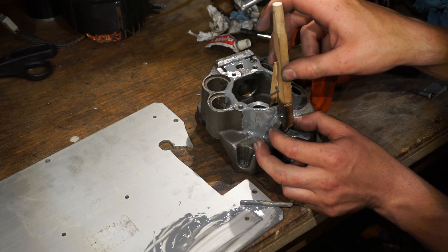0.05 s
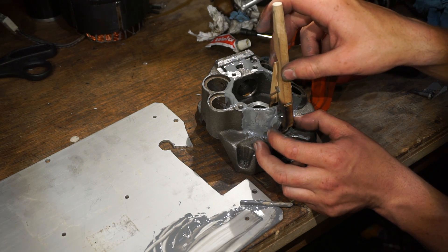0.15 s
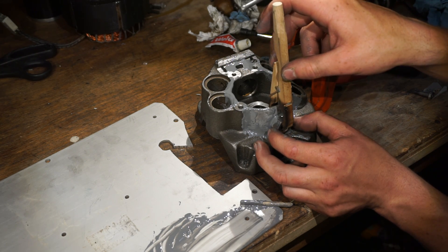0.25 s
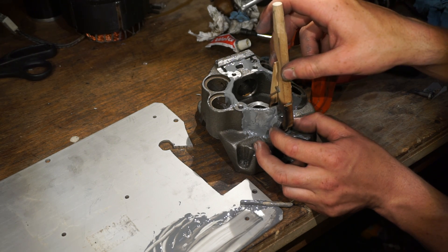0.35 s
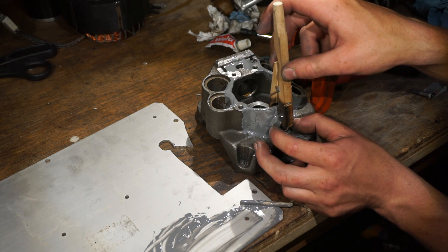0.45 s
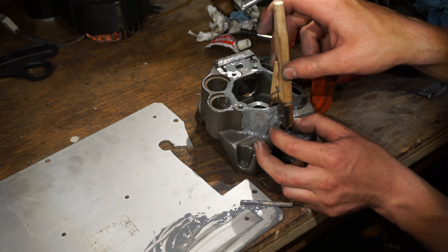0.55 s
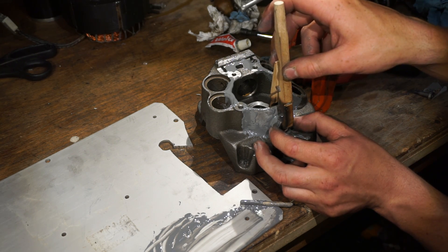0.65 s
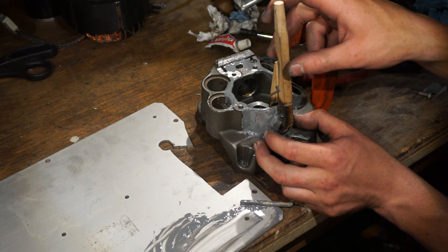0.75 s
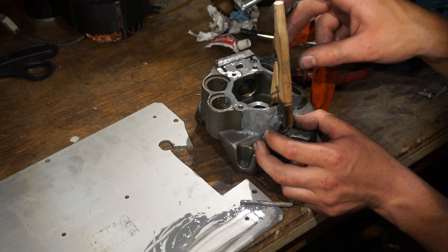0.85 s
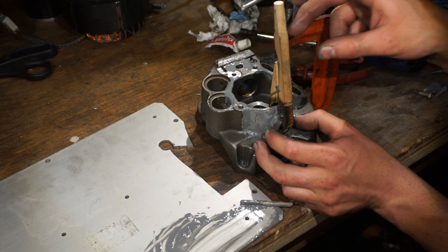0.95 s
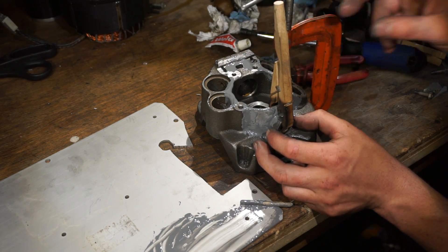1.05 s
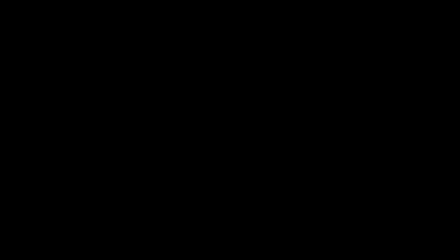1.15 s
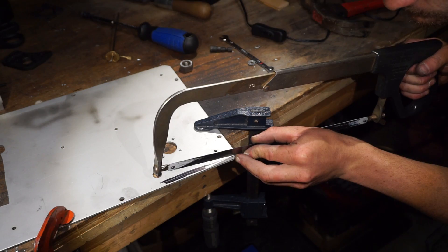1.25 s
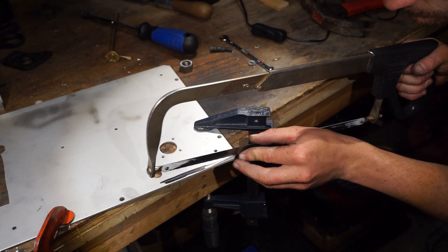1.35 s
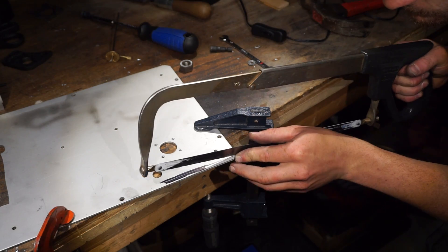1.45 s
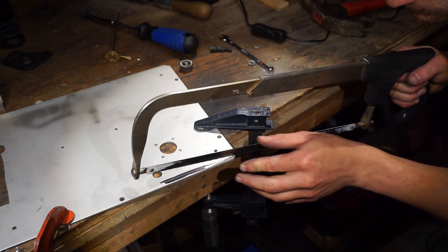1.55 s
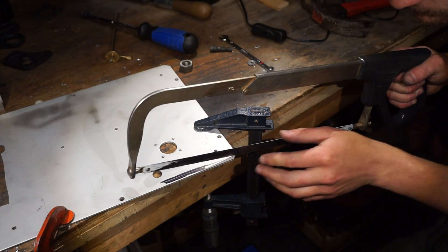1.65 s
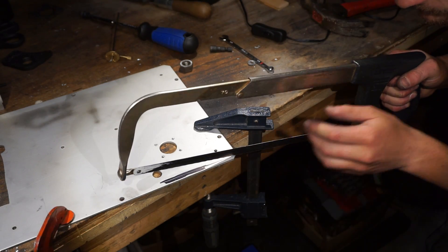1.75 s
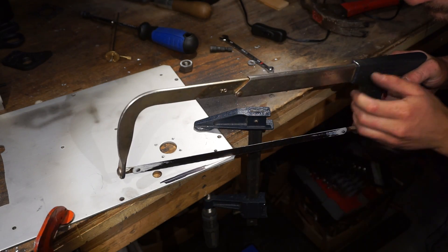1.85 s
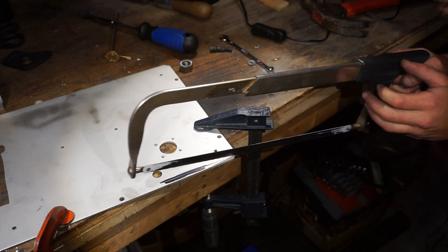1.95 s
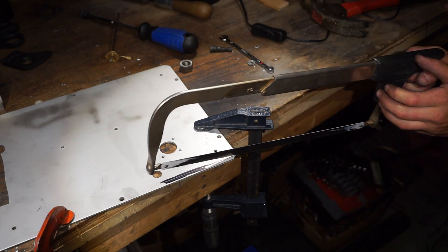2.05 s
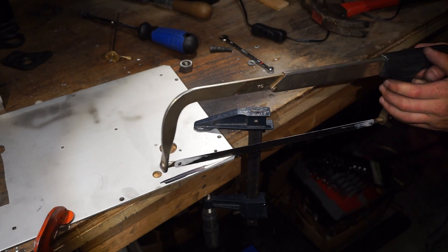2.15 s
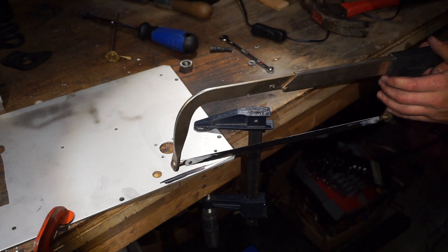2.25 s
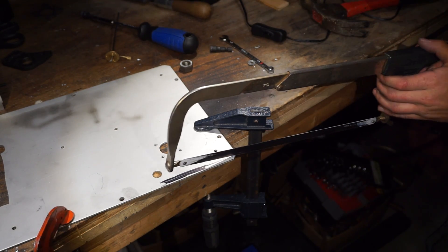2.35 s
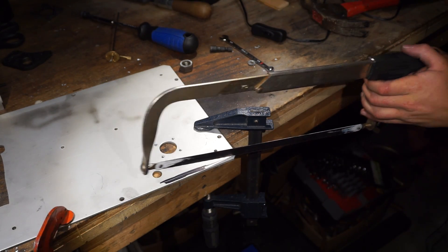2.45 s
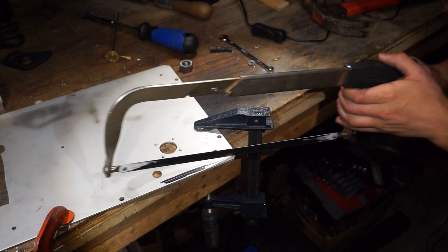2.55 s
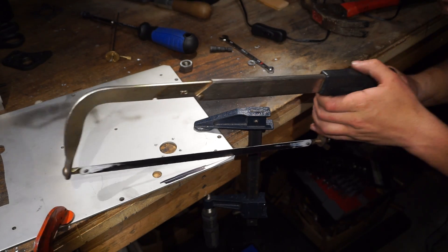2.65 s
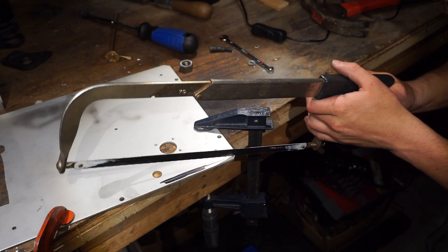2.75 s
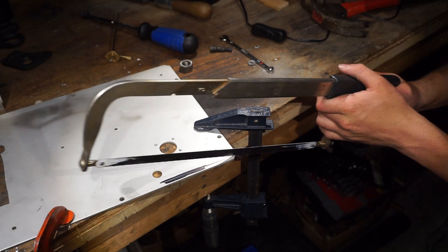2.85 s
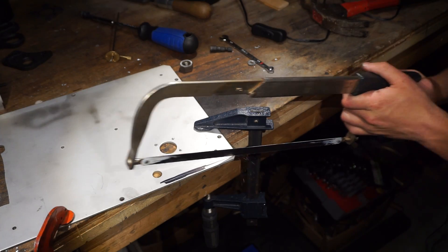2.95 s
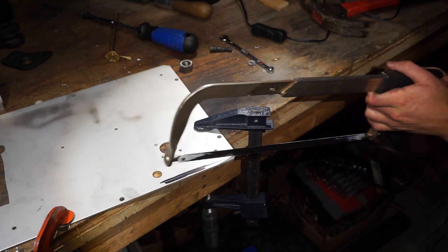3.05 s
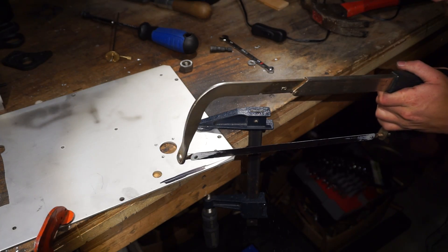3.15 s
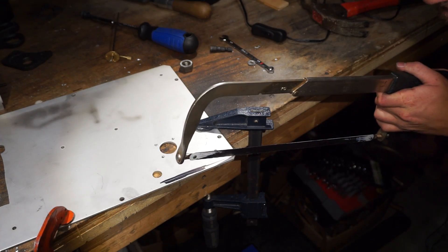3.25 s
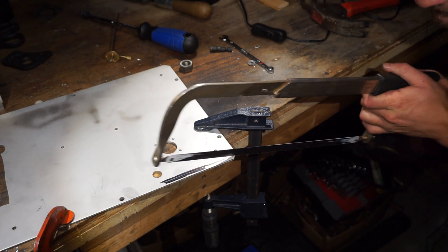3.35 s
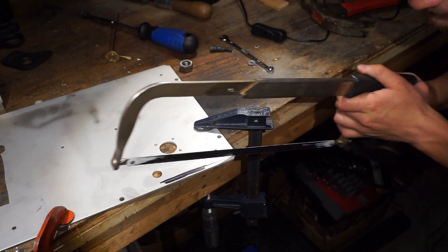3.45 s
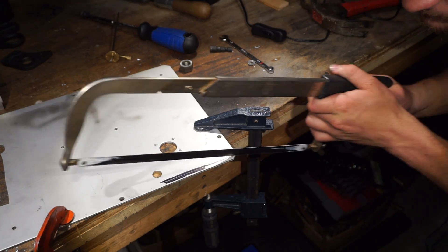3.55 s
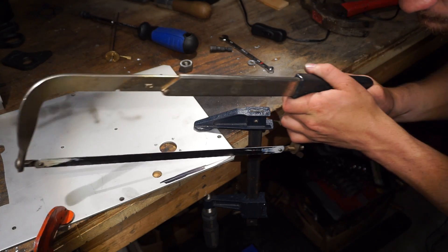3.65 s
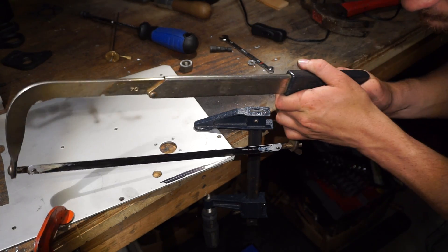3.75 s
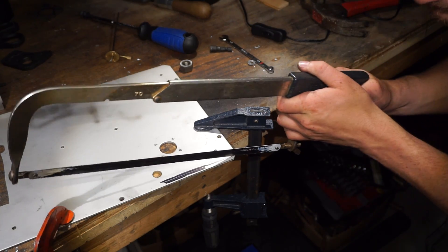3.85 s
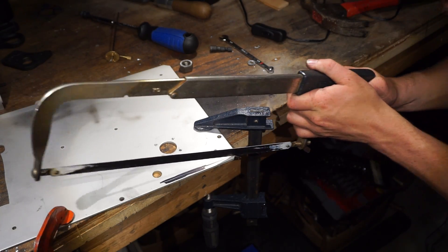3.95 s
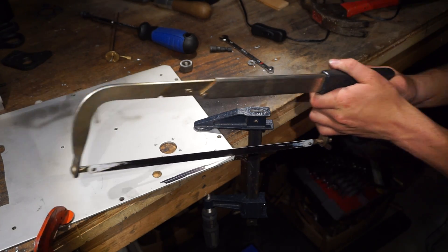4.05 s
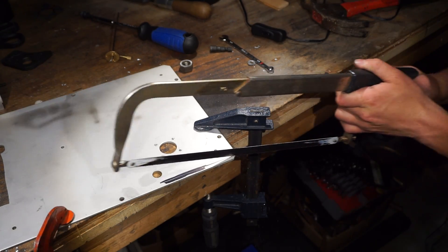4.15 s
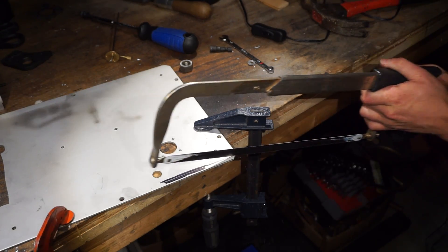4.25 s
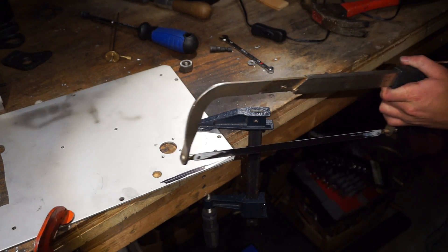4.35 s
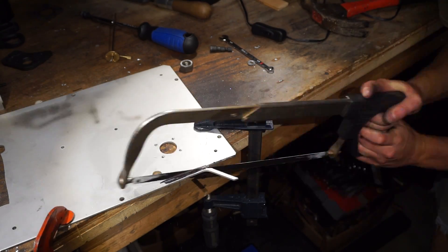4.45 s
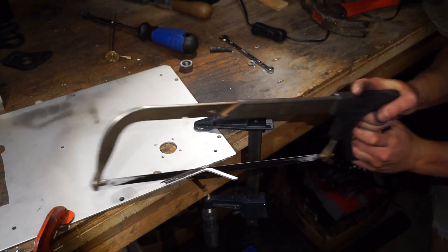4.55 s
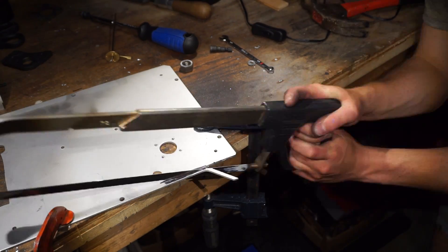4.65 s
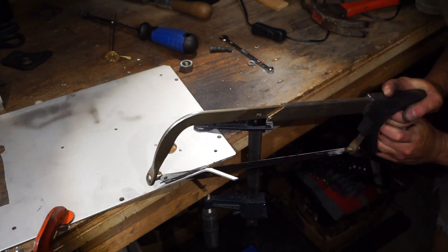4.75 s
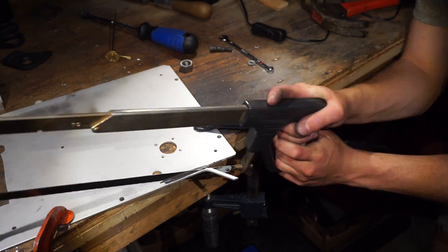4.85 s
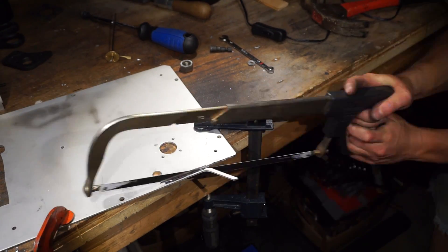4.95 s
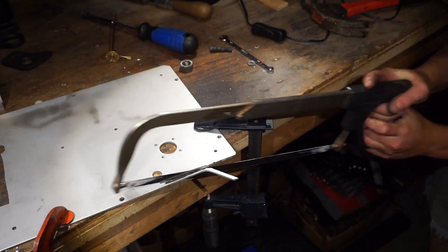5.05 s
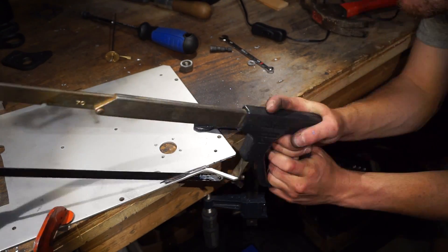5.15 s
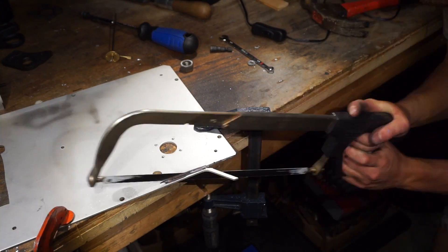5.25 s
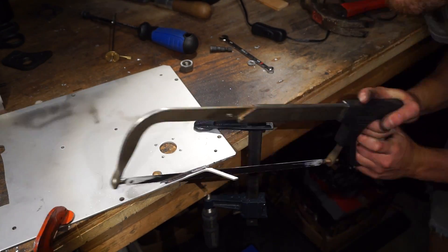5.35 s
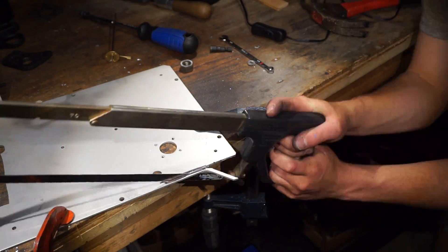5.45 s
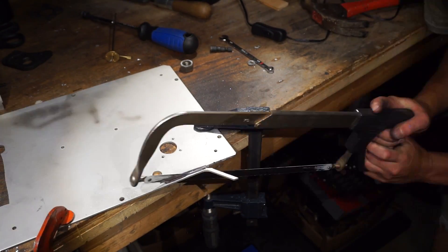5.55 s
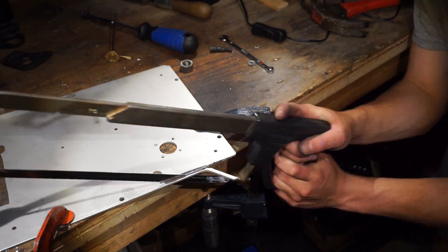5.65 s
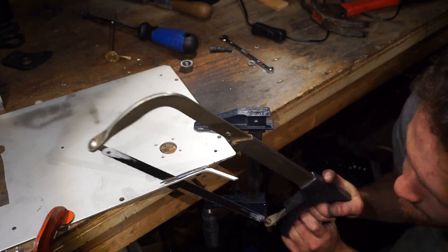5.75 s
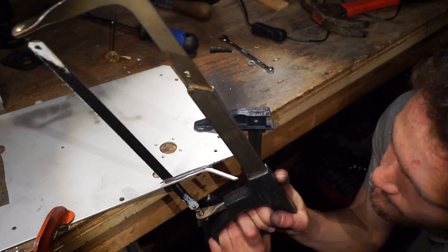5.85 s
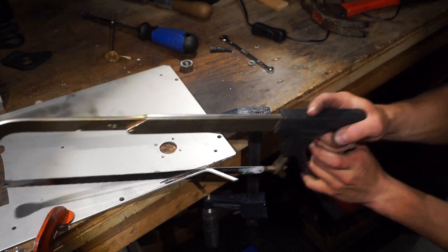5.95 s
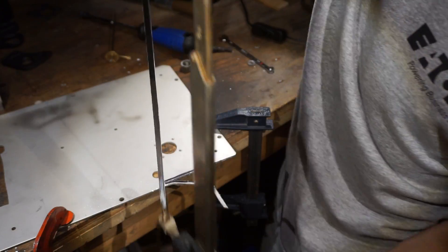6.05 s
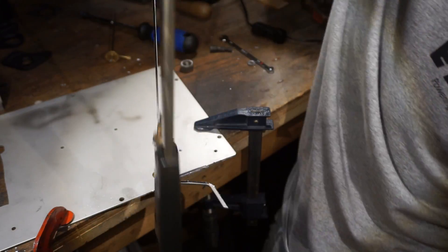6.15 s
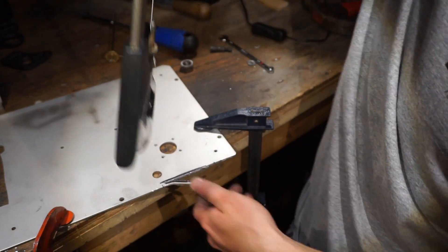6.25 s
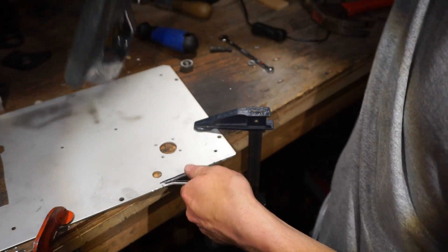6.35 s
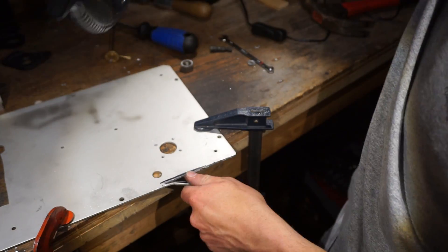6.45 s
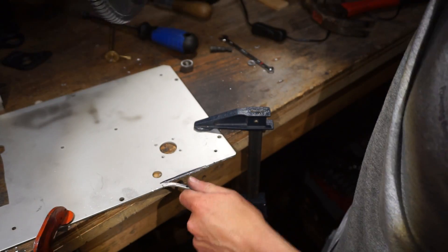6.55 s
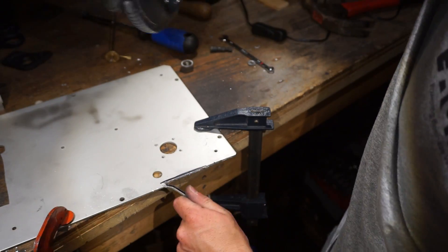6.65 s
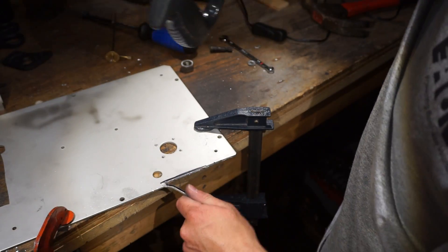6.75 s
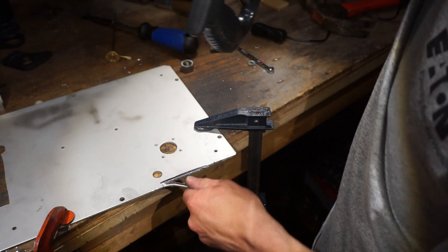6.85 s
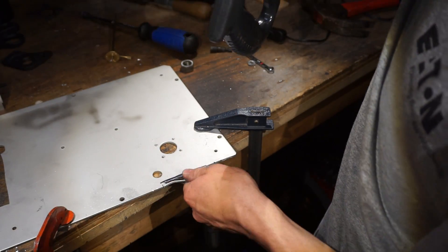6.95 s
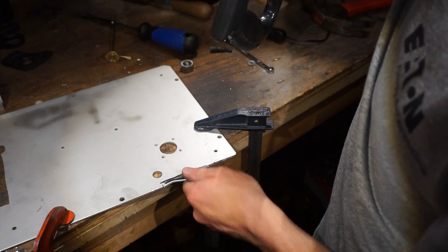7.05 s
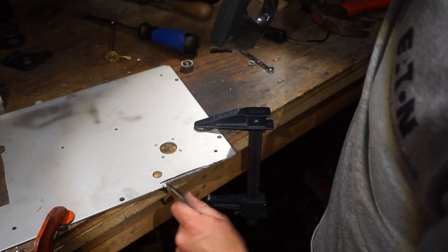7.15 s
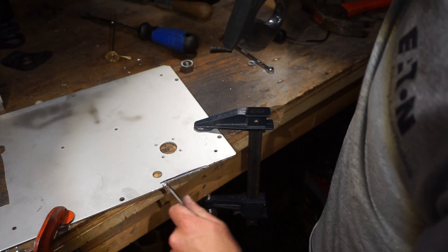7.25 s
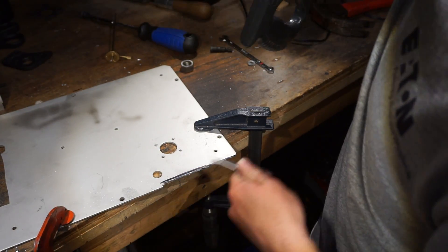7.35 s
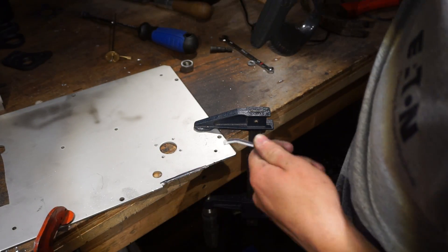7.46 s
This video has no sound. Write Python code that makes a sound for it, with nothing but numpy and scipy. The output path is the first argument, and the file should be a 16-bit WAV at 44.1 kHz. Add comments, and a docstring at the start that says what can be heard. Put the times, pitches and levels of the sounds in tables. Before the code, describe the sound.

Quiet workshop hiss and low rumble, then a hacksaw skids and bites into a clamped aluminium sheet. Slow uneven push and pull strokes ring the metal with a buzzing, hollow bench hum. A cut jumps to very fast sawing, then to near quiet with cloth swishes, small sharp ticks and a faint scrape of the bent strip. Close stereo microphone, saw mostly left, dry room.

```python
"""Quiet room tone comes first: coloured noise whose level changes in steps.
A hacksaw then cuts a clamped aluminium sheet, mostly to the left: slow strokes, then a very rapid run.
Uneven tooth strikes ring the sheet, its low sway, the blade's buzz and the bench.
Cloth then swishes (swells of grainy noise), and the cut strip ticks (short cracks that ring it)
and scrapes (tooth noise in broad bands). The sound dips to silence briefly three times."""
import sys
import numpy as np
from scipy import signal
from scipy.fft import rfft, irfft, next_fast_len
from scipy.io import wavfile
from scipy.ndimage import uniform_filter1d

SR = 44100
rng = np.random.default_rng(int(sys.argv[2]) if len(sys.argv) > 2 else 0)


def store_wav(level_fs):
    """Save 16-bit WAV to argv[1]."""
    pcm = np.round(np.clip(np.atleast_2d(level_fs), -1, 1) * 32767)
    wavfile.write(sys.argv[1], SR, pcm.T.astype(np.int16))


N = 331191
T = np.arange(N) / SR  # time in seconds
SIZE = next_fast_len(N + SR // 2)  # room for filter tails
HZ = np.fft.rfftfreq(SIZE, 1 / SR)

# Room tone from each time on, before colouring of the channels: t/s, hiss level/dB, rumble level/dB,
# high air level/dB
ROOM_STEPS = [(0, -59.5, -57.5, -67), (1.192, -58, -55.5, -58), (6.026, -67.5, -66.5, -93.5),
              (7.118, -64.5, -61, -63.5)]
# Colour of the hiss: f/Hz, relative level/dB per Hz
HISS_COLOUR = [(530, -41), (900, -6.5), (1680, -3), (2890, -7.5), (3680, -8), (12600, -14.5), (16000, -10)]
# Colour of the rumble: f/Hz, relative level/dB per Hz
RUMBLE_COLOUR = [(12, -37), (20, -5.5), (113, 0), (246, -4.5), (1270, -11), (1500, -18.5), (1950, -48),
                 (3300, -120)]
# Likeness of left and right in hiss and rumble: f/Hz, likeness/1 (negative means opposed)
ROOM_LIKENESS = [(60, 1), (240, 0.34), (950, -0.51), (3770, -0.021), (15000, -0.42)]
AIR_HZ = 9000  # the high air spans one octave from here

# Slow strokes, levels before the filters: way, bite t/s, lift t/s, rasp level at bite/dB, at lift/dB,
# fade/(dB per s), sway above the rasp at bite/dB, at lift/dB, top buzz above the rasp/dB, bench jolt level/dB
SLOW_STROKES = [("skate", 1.426, 1.43, -32, -37.5, 170, -8, -9, -16, -49),
                ("skate", 1.515, 1.556, -38, -39.5, 155, -21, -4, -17, -51),
                ("skate", 1.722, 1.76, -36, -36, 248, -11, 0.5, -2, -49),
                ("push", 2.0016, 2.249, -29.5, -37, 140, 1.5, -3, -8.5, -43),
                ("pull", 2.412, 2.694, -31.5, -25, 197, -8, -3.5, -5, -44.5),
                ("push", 2.88, 3.138, -22.5, -26, 156, -8, -5, -14.5, -40),
                ("pull", 3.3555, 3.71, -30, -25, 218, -10, 5.6, 2.5, -34.5),
                ("slip", 3.818, 3.806, -36, -38, 180, -1.5, -8, -12.5, -57),
                ("push", 3.99, 4.397, -24, -25, 61, -10, -6.5, -20.5, -38)]
# Ways to stroke: sway at bite f/Hz, at lift f/Hz, thrum at bite f/Hz, at lift f/Hz,
# lateness/1 (a power: higher makes the sway level change later)
STROKE_WAYS = {"push": (540, 520, 146, 92, 1.3), "pull": (500, 599, 190, 190, 9.4),
               "skate": (595, 609, 126, 166, 2), "slip": (540, 560, 175, 170, 3.3)}
# Teeth that catch hard: t/s, level/dB (before the swell shape and filters)
SNAGS_OF_TEETH = [(1.3554, -30), (1.3724, -17), (2.052, -25.5), (1.976, -25), (2.481, -14), (3.931, -24)]
# Start and end of the slow part: t/s, t/s
SLOW_SPAN = (1.34, 4.472)
RISE_DB_PER_S, ARCH_DB, REST_DB = 424, 2, -57  # before the bite; extra in mid-stroke; blade lying in the cut
LINGER = 0.71  # sway and buzz fade at this share of the rasp's pace
SWAY_DROP_HZ_PER_S, SINK_EARLY_S, SINK_S = 1300, 0.03, 0.07  # sway sinks from just before the lift, this long
BUZZ_BITE_HZ, BUZZ_LIFT_HZ, BUZZ_LOW_DB = 835, 745, -27
BUZZ_TOP, BUZZ_SPAN = 0.73, 0.34  # when the buzz peaks and how widely, as shares of the stroke
THRUM_DB, JOLT_LATE_S, JOLT_SPAN_S = -27, 0.04, 0.067  # above the rasp; the jolt as the arm brakes

# Ringing modes of the sheet: f/Hz, width f/Hz (widened where too narrow), relative level/dB
SHEET_MODES = [(963, 19, -11), (1480, 74, 4.5), (1930, 37, -21.5), (2624, 230, -1.5), (3010, 160, -0.5),
               (2987, 100, 1), (4363, 73, -10.5), (4820, 70, -4), (6706, 99, -9), (7730, 90, -10),
               (8730, 140, -16), (9380, 100, -9), (11250, 68, -16.5), (12230, 45, -11)]
# Modes of the sheet with the strip nearly off: f/Hz, width f/Hz (widened where too narrow), relative level/dB
DEEP_CUT_MODES = [(1392, 41, -1.5), (2825, 105, 6), (3310, 117, -0.5), (4300, 31, 4), (6650, 57, -10),
                  (8550, 84, -3), (10360, 23, -11), (10650, 310, -3.5)]
# Wide colour under the ringing modes: f/Hz, relative level/dB per Hz
RASP_COLOUR = [(140, -34.5), (230, -10), (840, -2.5), (952, -7.5), (1380, -2.5), (4380, -14.5),
               (7330, -19.5), (10800, -16), (16000, -18.5)]
# Likeness of left and right in the saw: f/Hz, likeness/1
SAW_LIKENESS = [(60, 0.74), (180, 1), (550, 0.79), (1650, 0.48), (4970, 0.37), (15000, 0.035)]
# How far the saw leans to the left: f/Hz, left minus right level/dB
SAW_LEAN = [(60, 15.5), (180, 1.5), (550, 1.5), (1650, 6.5), (4970, 8.5), (15000, 4.5)]
LEAST_WIDTH = 0.04  # the rubbing blade damps every mode to at least this share of its pitch
SKATE_DB, SKATE_UNTIL_S = -4, 1.9  # bright fizz while the groove is still shallow
RATTLE_DB, SHAKE_DB = -10, -18.5  # sheet rattle above its sway; deep bench shaking above the rasp

# Rapid run, at the strokes numbered below: t/s, rasp level/dB (before push, unevenness and filters)
RAPID_POINTS = [(4.485, -34.5), (4.769, -34.5), (5.058, -34.5), (5.243, -33), (5.329, -36), (5.508, -33),
                (5.717, -33), (5.908, -35.5), (5.943, -33.5), (5.997, -42)]
# Stroke numbers of those points, even ones are pulls: number/1
RAPID_NUMBERS = (0, 8, 16, 21, 23, 28, 34, 40, 41, 42)
RAPID_S, RAPID_THRUM_DB = 0.01, -18.5  # half length of a stroke; thrum above the rasp
RAPID_SWAY_HZ, RAPID_BUZZ_HZ, RAPID_THRUM_HZ = 515, 829, 143  # middle pitches; buzz is higher in a deep cut
PUSH_LATE_S, PUSH_DB, UNEVEN_DB = 0.0021, -2, -0.86  # pushes against pulls; random spread of all strokes
PULL_TILT_DB, PUSH_TILT_DB, TILT_SCATTER_DB = 10, -11, 5.5  # more tilt: stronger buzz, weaker sway

# Swishes of cloth: middle t/s, half length t/s, level/dB (before the grain is mixed)
CLOTH_SWISHES = [(6.049, 0.012, -65.5), (6.178, 0.042, -52.5), (6.512, 0.066, -63), (6.611, 0.038, -68),
                 (7.162, 0.0098, -60)]
# Colour of the cloth: f/Hz, relative level/dB per Hz
CLOTH_COLOUR = [(180, -69), (300, -39), (930, -6), (1060, -14), (3080, -2), (6300, -9), (13100, -4),
                (16000, -12)]

# Ticks of strip and tool: t/s, level/dB (before filter and panning), brightest f/Hz,
# relative dull knock level/dB, left minus right level/dB
STRIP_TICKS = [(6.2078, -41, 5340, -12.5, 8), (6.249, -39.5, 4370, -14, 4), (6.4519, -37.5, 5040, -22, 2),
               (6.5204, -44, 2630, -21, -4), (6.5674, -33.5, 5000, -20, 4.5), (7.0943, -57, 9100, -17, 11),
               (7.1252, -58.5, 1530, 16.5, 4.0), (7.1501, -56, 4270, -28, 16), (7.3157, -38, 2460, -4.5, 6)]
# Ringing of the strip: f/Hz, relative level/dB, time to fade by 60 dB t/s
STRIP_RING = [(2770, -7, 0.032), (4500, 2, 0.045), (5320, 2, 0.048)]
# Dull knock of the sheet: lowest f/Hz, highest f/Hz, time to fade by 60 dB t/s
SHEET_KNOCK = (490, 950, 0.38)

# Fingers rubbing the strip: start t/s, end t/s, rise t/s, level/dB (before the left-right split)
FINGER_RUBS = [(6.301, 6.614, .025, -54.5), (6.709, 6.8, 0.046, -60.5)]
# Broad bands of the rubbing: f/Hz, width f/Hz (widened where too narrow), relative level/dB
RUBBING_BANDS = [(2530, 1100, 7.5), (3340, 130, 9), (4040, 710, 4.5), (5700, 600, 1.5)]
RUB_TAIL_S = 0.064

# Middles of the brief dips to silence: t/s
SILENT_DIPS = (1.185, 4.474, 6.027)
EDGE_HZ = 15950  # upper limit of the finished sound


def gain_of(db):
    """Turns decibels into a plain gain."""
    return 10 ** (np.asarray(db) / 20)


def evened(x):
    """Scales a signal to an average strength (rms) of 1."""
    return x / np.sqrt(np.mean(abs(x) ** 2) + 1e-20)


def read(points):
    """Reads a spectrum table at every frequency, with pitch on a logarithmic scale."""
    f, value = np.transpose(points)
    return np.interp(np.log(HZ + 1), np.log(f + 1), value)


def coloured(x, response):
    """Filters by a response that keeps the rms of white noise."""
    return irfft(rfft(x, SIZE) * evened(response), SIZE)[..., :N]


def band(x, low_hz, high_hz):
    """Keeps one band of frequencies and scales it to rms 1."""
    edges = signal.butter(2, [low_hz, high_hz], "band", fs=SR, output="sos")
    return evened(signal.sosfilt(edges, x))


def paired(a, b, same):
    """Spectra of left and right from two unrelated signals, alike by the given share."""
    c = np.clip(read(same), -1, 1)
    a, b = rfft(a, SIZE), rfft(b, SIZE)
    return np.array([a, c * a + np.sqrt(1 - c ** 2) * b])


def room_tone():
    """Hiss, rumble and thin high air are coloured noises that step to new levels at set times."""
    start, *levels_db = np.transpose(ROOM_STEPS)
    step = np.searchsorted(start, T, "right") - 1
    hiss, rumble, air = gain_of(levels_db)[:, step]
    noise = rng.standard_normal((3, 2, N))
    mix = hiss * coloured(noise[0], gain_of(read(HISS_COLOUR)))
    mix += rumble * coloured(noise[1], gain_of(read(RUMBLE_COLOUR)))
    room = irfft(paired(*mix, ROOM_LIKENESS), SIZE)[:, :N]
    return room + air * band(noise[2], AIR_HZ, 2 * AIR_HZ)


def slow_strokes():
    """Each stroke rises, bites, arches and fades; its way sets how sway and thrum move."""
    power, tones = np.zeros((4, N)), np.zeros((3, N))
    power[0] = gain_of(2 * REST_DB)
    for way, bite, lift, bite_db, lift_db, fade, sway_0_db, sway_1_db, buzz_db, jolt_db in SLOW_STROKES:
        sway_0, sway_1, thrum_0, thrum_1, lateness = STROKE_WAYS[way]
        early, late = np.maximum(bite - T, 0), np.maximum(T - lift, 0)
        u = np.clip((T - bite) / (lift - bite), 0, 1)  # share of the stroke done
        held_db = bite_db + (lift_db - bite_db) * u + ARCH_DB * np.sin(np.pi * u) - RISE_DB_PER_S * early
        rasp_db = held_db - fade * late
        lingering_db = held_db - LINGER * fade * late
        sway_db = sway_0_db + (sway_1_db - sway_0_db) * u ** lateness
        buzz_top = np.exp(-.5 * ((u - BUZZ_TOP) / BUZZ_SPAN) ** 2)
        buzz_now_db = BUZZ_LOW_DB + (buzz_db - BUZZ_LOW_DB) * buzz_top
        jolt = gain_of(2 * jolt_db) * np.exp(-((T - lift - JOLT_LATE_S) / JOLT_SPAN_S) ** 2)
        # doubled decibels turn gain into power, so strokes add up smoothly
        power[0] += gain_of(2 * rasp_db)
        power[1] += gain_of(2 * (lingering_db + sway_db))
        power[2] += gain_of(2 * (lingering_db + buzz_now_db))
        power[3] += gain_of(2 * (rasp_db + THRUM_DB)) + jolt
        ends = np.array([(sway_0, sway_1), (BUZZ_BITE_HZ, BUZZ_LIFT_HZ), (thrum_0, thrum_1)])
        hz = ends[:, :1] + np.diff(ends) * u
        hz[0] -= SWAY_DROP_HZ_PER_S * np.clip(T - lift + SINK_EARLY_S, 0, SINK_S)
        # each stroke takes over the pitches 60 ms before its bite
        tones = np.where((T > bite - .06) | (tones == 0), hz, tones)
    rasp, *others = np.sqrt(power)
    for at, db in SNAGS_OF_TEETH:
        since = np.maximum(T - at, 0) / .004  # a catch swells for a moment, then slips free
        rasp = rasp + gain_of(db) * since * np.exp(-since)
    on = (T > SLOW_SPAN[0]) & (T <= SLOW_SPAN[1])
    return np.array([rasp, *others, *tones]) * on


def teeth(per_s, spread_db, grit, shudder_db):
    """Two trains of uneven tooth strikes over the grit of chips; the blade shudders in bunches."""
    strength_db = spread_db * np.minimum(rng.exponential(1, (2, N)), 3.5)
    size = gain_of(strength_db) * np.sign(rng.random((2, N)) - .5)
    strikes = evened(size * (rng.random((2, N)) < per_s / SR))
    slow_noise = uniform_filter1d(rng.standard_normal(N), size=300)
    shudder = evened(uniform_filter1d(slow_noise, size=300))
    return evened((strikes + grit * rng.standard_normal((2, N))) * gain_of(shudder_db * shudder))


def modes(table):
    """Response of damped resonances with alternating signs."""
    f, width, db = np.transpose(table)
    width = np.maximum(width, LEAST_WIDTH * f)
    total = 0
    for k in range(len(f)):
        damping = 1j * width[k] * HZ
        total = total + (-1) ** k * gain_of(db[k]) * damping / (f[k] ** 2 - HZ ** 2 + damping)
    return total


def resonate(x, hz, width):
    """A moving resonance: shift down, smooth twice, shift back; white noise keeps rms 1."""
    turn = np.exp(2j * np.pi * np.cumsum(hz) / SR)
    r = np.exp(-np.pi * width / SR)
    smooth = signal.lfilter([(1 - r) ** 2], [1, -2 * r, r * r], x / turn)
    return (turn * smooth).real * np.sqrt(8 / (1 - r))


def shimmer(x, t60, turns_per_s):
    """The countless small modes of sheet and room: dense rings take turns as the contact point moves."""
    t = np.arange(SR // 5) / SR
    rings = rng.standard_normal((3, len(t))) * gain_of(-60 * t / t60)
    rings /= np.linalg.norm(rings, axis=1, keepdims=True)
    shares = np.sqrt(2 / 3) * np.cos(np.pi * (turns_per_s * T + np.arange(3)[:, None] / 3))
    return signal.oaconvolve(x * shares, rings, axes=1).sum(0)[:N]


def bench(rasp, thrum, hz):
    """The bench hums at a moving pitch over a wide, deep shaking that follows the rasp."""
    shake = rng.standard_normal(N)
    return thrum * resonate(shake, hz, 38) + gain_of(SHAKE_DB) * rasp * band(shake, 56, 190)


def saw():
    """The teeth drive the sheet's modes, its low sway, the blade's buzz and the bench."""
    slow, rapid = slow_strokes(), rapid_strokes()
    rasp_gain, _, _, thrum, sway_hz, buzz_hz, thrum_hz = slow + rapid
    drive = teeth(1200, 4.2, 0.9, 1.0)
    wide = gain_of(read(RASP_COLOUR))
    rasp = coloured(drive * slow[0], modes(SHEET_MODES) + gain_of(-2.5) * wide)
    rasp += coloured(drive * rapid[0], modes(DEEP_CUT_MODES) + gain_of(7.5) * wide)
    rasp += gain_of(SKATE_DB) * slow[0] * (T < SKATE_UNTIL_S) * band(drive, 5900, 17300)
    low = slow[1] * resonate(drive[0], sway_hz, 133.4)
    low += slow[2] * resonate(drive[0], buzz_hz, 57.5)
    low += gain_of(RATTLE_DB) * slow[1] * band(drive[0], 250, 900)
    # short strokes give the tones no time to settle: wider, drier resonances
    low += rapid[1] * resonate(drive[0], sway_hz, 260)
    low += rapid[2] * resonate(drive[0], buzz_hz, 157)
    near = rasp[0] + low + 0.61 * shimmer(rasp[0] + low, 0.065, 9)
    far = 1.01 * rasp[1] + 0.69 * shimmer(rasp[0] + low, 0.064, 1.496)
    lean = gain_of(read(SAW_LEAN) / 2)
    thin = HZ ** 2 / (HZ ** 2 + 200 ** 2)  # a thin sheet radiates little bass
    sheet = irfft(paired(near, far, SAW_LIKENESS) * [lean, 1 / lean] * thin, SIZE)[:, :N]
    return sheet + bench(rasp_gain, thrum, thrum_hz)


def rapid_strokes():
    """The same controls for the rapid run: one smooth swell for each stroke, pull and push in turn."""
    k = np.arange(RAPID_NUMBERS[-1] + 1)
    at, peak_db = (np.interp(k, RAPID_NUMBERS, column) for column in np.transpose(RAPID_POINTS))
    push = k % 2
    chance = rng.standard_normal((len(k), 4)).T
    at = at + PUSH_LATE_S * push
    peak_db = peak_db + PUSH_DB * push + UNEVEN_DB * chance[0]
    tilt_db = np.where(push, PUSH_TILT_DB, PULL_TILT_DB) + TILT_SCATTER_DB * chance[1]
    on = T > SLOW_SPAN[1]
    t = T[::32]  # coarse time is enough for the swells
    pitch_scatter = 1 + chance[2:] * [[.1], [.03]]
    sway, buzz = (np.interp(T, at, scatter) for scatter in pitch_scatter)
    swell_power = gain_of(2 * peak_db) * np.exp(-((t[:, None] - at) / RAPID_S) ** 2)
    rasp = on * np.interp(T, t, np.sqrt(swell_power.sum(1)))
    tilt_db = np.interp(T, at, tilt_db)
    return np.array([rasp, rasp * gain_of(-4.5 - 0.23 * tilt_db), rasp * gain_of(-9.5 + 0.5 * tilt_db),
                     rasp * gain_of(RAPID_THRUM_DB),
                     on * RAPID_SWAY_HZ * sway, on * RAPID_BUZZ_HZ * buzz, on * RAPID_THRUM_HZ])


def cloth():
    """Cloth swishes are soft swells of grainy noise."""
    swell = sum(gain_of(db) * np.exp(-.5 * ((T - s) / half) ** 2) for s, half, db in CLOTH_SWISHES)
    noise = rng.standard_normal((2, N))
    flutter = evened(uniform_filter1d(rng.standard_normal(N), size=200))
    grain = noise * gain_of(1.47 * flutter)
    shared = 1.8 * grain + .5 * grain[::-1]  # each side leaks into the other
    return swell * coloured(shared, gain_of(read(CLOTH_COLOUR)))


def ticks():
    """A short crack coloured round its brightest pitch rings the strip; a dull knock goes with it."""
    out, t = np.zeros((2, N)), np.arange(SR // 4) / SR
    ring = sum(gain_of(db - 60 * t / t60) * np.sin(2 * np.pi * hz * t) for hz, db, t60 in STRIP_RING)
    knock_low_hz, knock_high_hz, knock_t60 = SHEET_KNOCK
    for s, db, hz, knock_db, pan_db in STRIP_TICKS:
        noise = rng.standard_normal((3, len(t)))
        # a quick fade first, then a weaker, longer one
        crack = noise[:2] * (gain_of(-60 * t / 0.013) + gain_of(-9.5 - 60 * t / 0.28))
        limits = [hz * 0.23, min(hz * 2.05, 18000)]
        edges = signal.butter(N=3, Wn=limits, btype="band", fs=SR, output="sos")
        crack = signal.sosfilt(edges, crack + 0.43 * ring / abs(ring).max())
        knock = band(noise[2], knock_low_hz, knock_high_hz)
        knock = knock * gain_of(knock_db - 10.5 - 60 * t / knock_t60)
        sound = crack + knock
        part = out[:, round(s * SR):][:, :len(t)]
        part += gain_of(db + pan_db * np.array([[.5], [-.5]])) * sound[:, :part.shape[1]]
    return out


def rubbing():
    """Fingers on the strip make a faint uneven scrape: tooth noise through a few broad bands."""
    level = 0
    for start, end, rise, db in FINGER_RUBS:
        tail = np.exp(-np.maximum(T - end, 0) / RUB_TAIL_S)
        level = level + gain_of(db) * np.clip((T - start) / rise, 0, 1) * tail
    scrape = coloured(teeth(1500, 1.9, 0.86, 1.1), modes(RUBBING_BANDS))
    return level * scrape * gain_of([[2], [-2]])  # 4 dB stronger on the left


def scene():
    """Adds all the sources together."""
    return saw() + ticks() + cloth() + rubbing() + room_tone()


def record(dry):
    """Dips the level to silence briefly at set times, then removes the highest frequencies."""
    fade = np.prod([np.minimum(abs(T - s) / .006, 1) for s in SILENT_DIPS], axis=0)
    low_pass = signal.firwin(511, EDGE_HZ, window=("kaiser", 9), fs=SR)
    return signal.oaconvolve(dry * fade, low_pass[None], "same")


dry = scene()
out = record(dry)
store_wav(out)
```